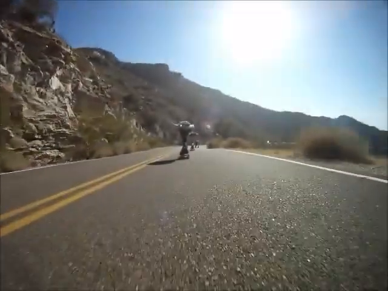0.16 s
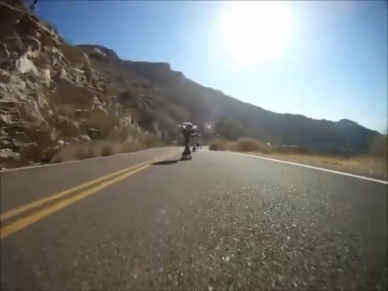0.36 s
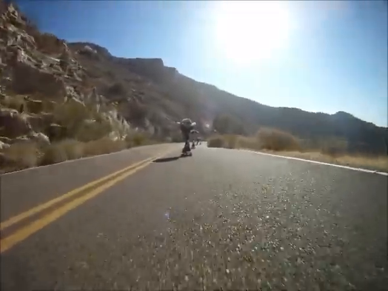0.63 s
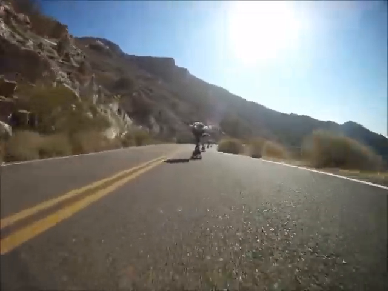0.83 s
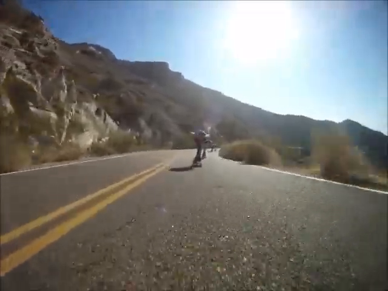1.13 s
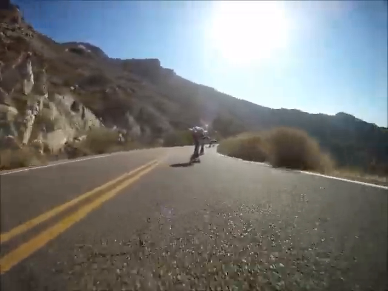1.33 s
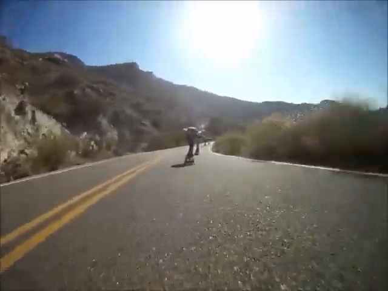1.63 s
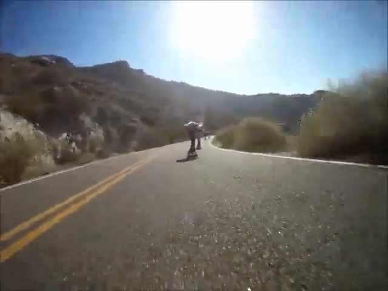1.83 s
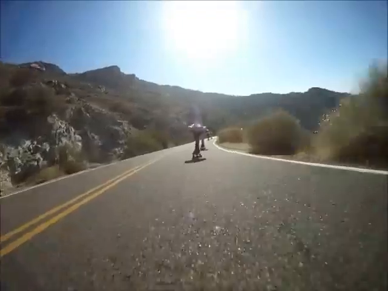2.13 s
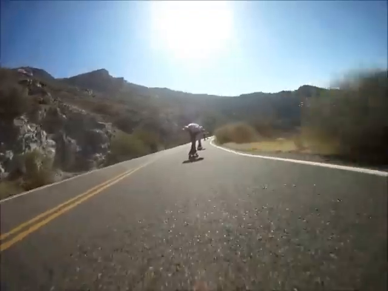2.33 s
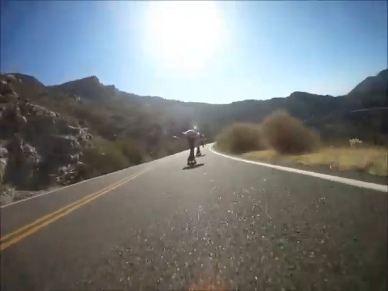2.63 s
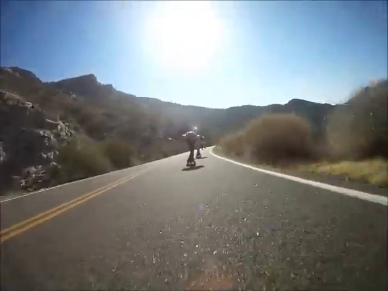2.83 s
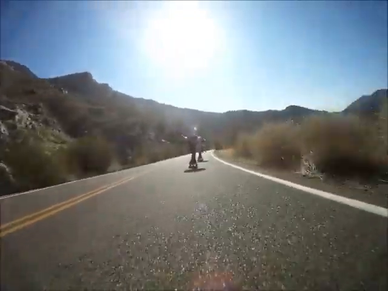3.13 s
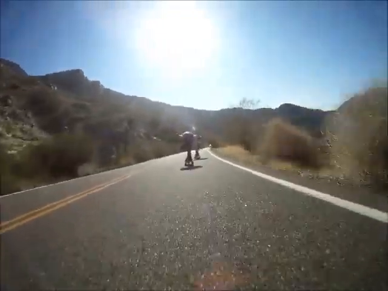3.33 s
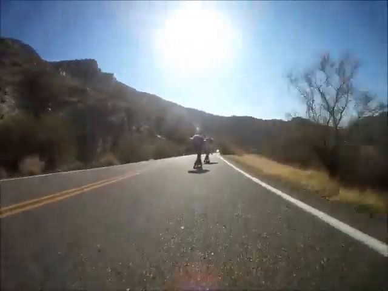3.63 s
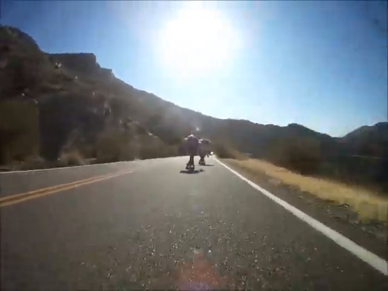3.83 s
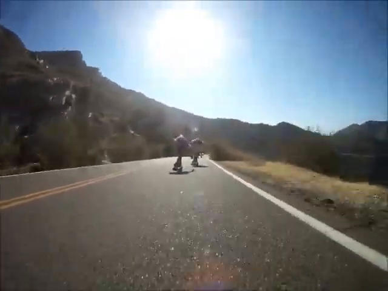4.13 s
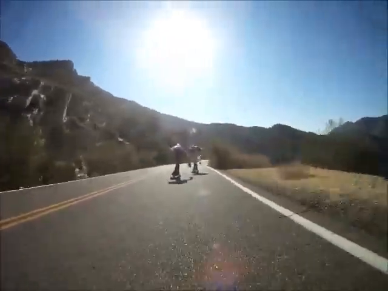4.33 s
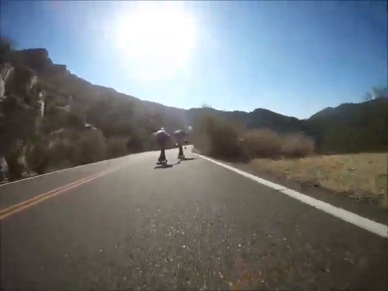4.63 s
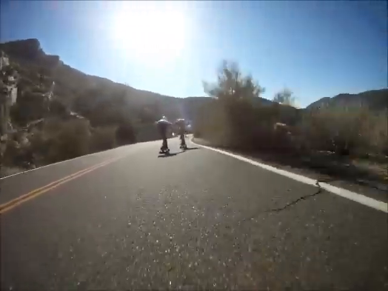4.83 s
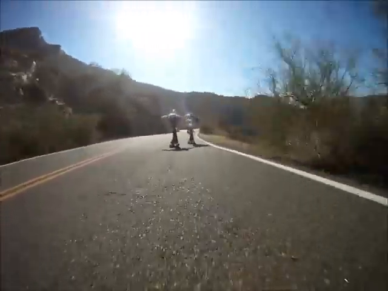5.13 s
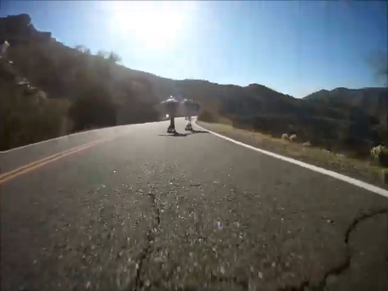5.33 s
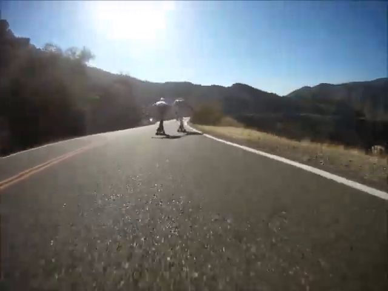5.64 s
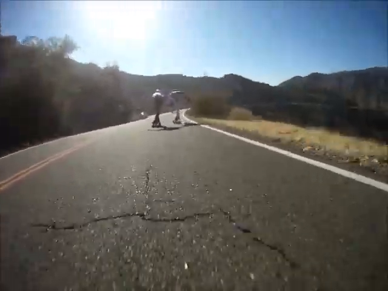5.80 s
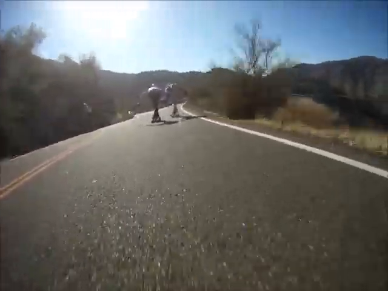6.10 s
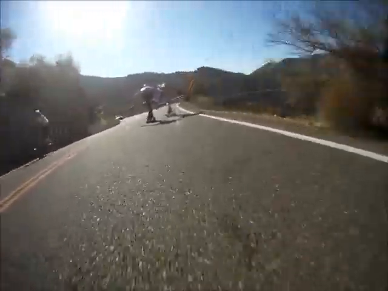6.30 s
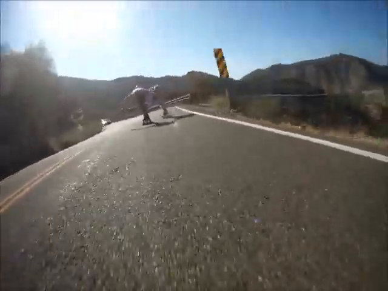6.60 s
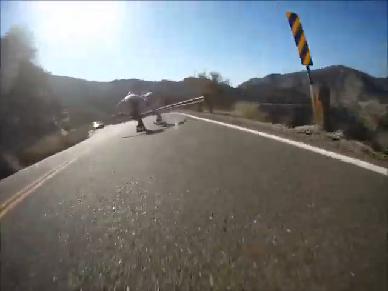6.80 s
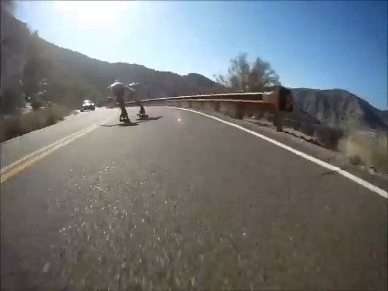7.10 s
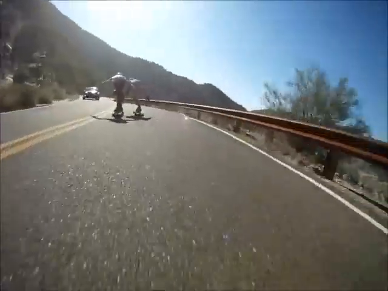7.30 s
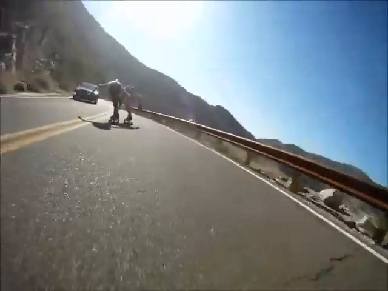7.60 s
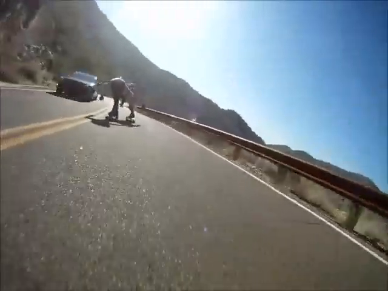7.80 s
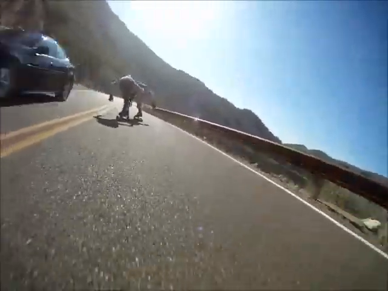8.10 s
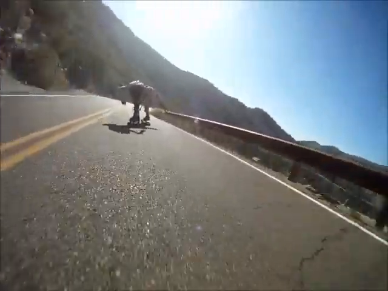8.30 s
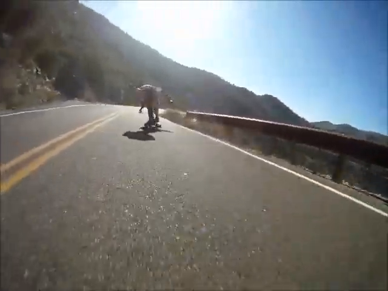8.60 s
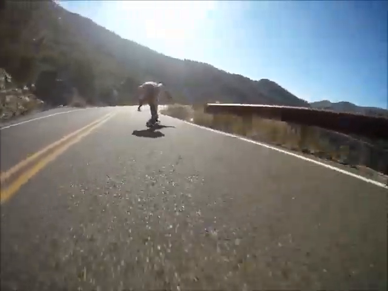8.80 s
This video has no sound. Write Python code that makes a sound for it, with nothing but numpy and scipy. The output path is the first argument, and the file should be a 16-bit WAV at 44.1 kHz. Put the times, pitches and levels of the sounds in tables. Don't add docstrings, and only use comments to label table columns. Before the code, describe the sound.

Gritty, metallic wheel roar from a longboard on pavement swells gradually, joined by low wind flutter, several heavy thumps and one sharp pebble click.

```python
import sys
import numpy as np
from scipy import signal
from scipy.fft import rfft, irfft
from scipy.io import wavfile
from scipy.ndimage import uniform_filter1d

SR = 44100
rng = np.random.default_rng(int(sys.argv[2]) if len(sys.argv) > 2 else 0)


def to_wav(s):
    ch = np.atleast_2d(s).T
    pcm = np.round(np.clip(ch, -1, 1) * 32767)
    wavfile.write(sys.argv[1], SR, pcm.astype(np.int16))


def ratio_of_db(decibels):
    return 10 ** (np.asarray(decibels, float) / 20)


N = 394694


def evened(x):
    return x / np.sqrt(np.mean(x ** 2) + 1e-20)


def curves(rows, t):
    s, *columns = np.transpose(rows)
    return [np.interp(t, s, c) for c in columns]


def slow(t, low_hz, top_hz):
    total = 0
    for hz in np.geomspace(low_hz, top_hz, num=30):
        total = total + np.sin(2 * np.pi * (hz * t + rng.random())) / np.sqrt(hz)
    return evened(total)


def plateau(t, start, length, edge):
    return (np.tanh((t - start) / edge) - np.tanh((t - start - length) / edge)) / 2


def power_of(modes, hz, steep):
    power = sum(ratio_of_db(db) ** 2 / (1 + (2 * (hz - f) / width) ** 2) ** steep for f, width, db in modes)
    return power / power.mean()


def add(mix, s, sound):
    part = mix[round(s * SR):][:len(sound)]
    part += sound[:len(part)]


# time in seconds, rolling level in dB, load on the deck in dB,
# fineness of the grit in dB.
ROLLING = [(0.0, -52.5, -8.5, -16), (.95, -50.5, -6, -13.5), (1.8, -45.5, -7.5, -15.5),
           (2.35, -44.5, -5.5, -15.5), (2.9, -43, -8.5, -14), (3.5, -42, -8, -15), (4.15, -39.5, -6, -14),
           (4.6, -40.5, -8, -13), (5.2, -40, -6, -12.5), (5.7, -38.5, -2.5, -14), (6.3, -40, -2, -11),
           (6.9, -39, -1, -14), (7.15, -42, -0.5, -11.5), (7.5, -40.5, -0.5, -11), (7.8, -42, 1.5, -9),
           (8.1, -40, -2.5, -12), (8.65, -38.5, -4, -13.5), (8.95, -41, 0, -13)]
# start in seconds, change in dB, length in seconds.
HOPS = [(1.85, -2.5, .03), (1.76, 1.2, .07), (1.95, 2, .12), (2.41, -4, .1), (2.425, -4, .07),
        (2.675, -4, .04), (2.77, 1.2, .1), (3.47, -2, .07), (4.04, 1.5, .2), (5.06, -2, .05),
        (5.36, -2.5, 0.034), (6.02, -1.5, 0.024), (6.05, 2, .04), (7.92, 1.5, .03)]
# pitch in Hz, width in Hz, level in dB.
DECK = [(1045, 95, -6), (1140, 75, -1), (1259.6, 138, 1)]
# pitch in Hz, width in Hz, level in dB.
HOUSING = [(388, 580, -22), (546, 80, -19), (773, 144, -18), (890, 78, -19.5), (1004, 115, -6.5),
           (1480, 120, -8.5), (1695, 320, -8), (2116, 212, -1.5), (2283, 245, -0.5), (2566, 280, -5.5),
           (2835, 99, -7.5), (3220, 460, -10)]
# pitch in Hz, width in Hz, level in dB.
SMALL_PARTS = [(3650, 520, 1), (3963, 170, 1.5), (4260, 170, -2.5), (4810, 330, 1.5), (5055, 150, -6.5),
               (5496, 310, -5.5)]


def wheels():
    stones_per_s, hop_edge_s, deck_wobble_db = 16000, 0.0077, 0.7
    parts_hop = 0.45
    stone_db = 0.56 * np.minimum(rng.exponential(1, N), 4)
    knocks = rng.standard_normal(N) * ratio_of_db(stone_db) * (rng.random(N) < stones_per_s / SR)
    knocks *= ratio_of_db(0.25 * slow(np.arange(N) / SR, 10.0, 90))
    hz, t, spectrum = signal.stft(evened(knocks), SR, nperseg=1024, noverlap=768)

    level_db, load_db, grit_db = curves(ROLLING, t)
    hop_db = sum(db * plateau(t, s, length, hop_edge_s) for s, db, length in HOPS)
    level_db = level_db + hop_db
    deck_db = load_db + deck_wobble_db * slow(t, 3.0, 25)
    parts_db = grit_db - (1 - parts_hop) * hop_db + 0.5

    ring = power_of(HOUSING, hz, 1.58)[:, None]
    ring = ring + np.outer(power_of(DECK, hz, 1.86), ratio_of_db(deck_db) ** 2)
    ring = ring + np.outer(power_of(SMALL_PARTS, hz, 1.2), ratio_of_db(parts_db) ** 2)

    patches = uniform_filter1d(rng.standard_normal(spectrum.shape), size=6, axis=1)
    patches = evened(uniform_filter1d(patches, size=8, axis=0))
    spectrum = spectrum * np.sqrt(ring) * ratio_of_db(level_db + 1.39 + 0.57 * patches)
    return signal.istft(spectrum, SR, nperseg=1024, noverlap=768)[1][:N]


def swing(hz, width, lumpy):
    r = np.exp(-np.pi * width / SR)
    z = rng.standard_normal(N) + 1j * rng.standard_normal(N)
    for _ in range(2):
        z = signal.lfilter([1 - r], [1, -r], z)
    power = abs(z) ** 2
    z = z / (power + power.mean() / 10) ** ((1 - lumpy) / 2)
    return evened((z * np.exp(2j * np.pi * hz * np.arange(N) / SR)).real)


# time in seconds, level in dB.
AIRSPEED = [(0.0, -46), (.15, -61), (.5, -56), (1.3, -55), (1.6, -51), (2.25, -48), (2.6, -43.5),
            (2.9, -46), (3.2, -45.5), (3.8, -45), (4.05, -40), (4.45, -44), (5.05, -44), (5.3, -43),
            (6.3, -42), (7.3, -44.5), (8.5, -41), (8.95, -45)]
# start in seconds, length in seconds, depth in dB.
LULLS = [
    (.33, .12, -5),
    (1.34, .1, -7),
    (2.95, .06, -5),
    (4.66, .06, -6),
    (5.0, .1, -6),
    (6.62, .13, -6),
    (7.07, .06, -10),
    (7.35, .06, -9),
    (7.82, .05, -6),
]
# start in seconds, length in seconds, level in dB, bounce over sway in
# dB.
SMALL_GUSTS = [
    (1.533, 0.067, -42.5, 9),
    (1.74, .06, -44, 4),
    (2.557, 0.05, -36.5, 7),
    (3.06, 0.066, -41, -8),
    (3.38, .04, -36, 1),
    (3.933, 0.062, -36, 2),
    (4.067, .04, -36, 0),
    (8.89, .06, -39, -10),
               (4.38, 0.054, -36.5, 0.1), (4.825, 0.03, -37, -2), (5.152, 0.046, -36, 5),
              (5.243, 0.09, -34, 0.1), (5.619, 0.052, -37, 0.1), (5.725, 0.06, -36, -2),
              (5.913, 0.08, -38, -3), (6.084, 0.05, -38, 0.1), (6.154, 0.072, -36.5, 2),
              (6.232, 0.13, -38, 0.1), (6.439, 0.034, -34, 0.1), (6.805, 0.034, -36, 3),
              (6.858, 0.034, -32, 5), (6.906, 0.072, -36, 0.1), (7.008, 0.042, -34.5, -1),
              (7.256, 0.032, -36, 0.1), (7.305, 0.03, -38, 0.1), (7.483, 0.083, -37, 2),
              (7.571, 0.03, -34, 3), (7.651, 0.039, -36, 0.1), (7.892, 0.063, -35, 3),
              (8.078, 0.044, -37, 0.1), (8.13, 0.032, -36, 0.1), (8.197, 0.091, -33, -1),
              (8.341, 0.032, -33, 0.1), (8.399, 0.3, -32.5, -1), (8.745, 0.11, -33, -5)]
# pitch in Hz, level in dB per Hz.
ROAR_COLOUR = [(22, -3), (55, -30), (105, -5), (150, -4), (220, -10), (330, -19), (600, -24.5), (1500, -70)]


def wind(shoves):
    gust_edge_s, flutter_db = 0.02, 1.5
    sway_db, bounce_db = -0.5, -1
    roar_db, roar_share = -55.8, 0.75
    gust_roar_db, thump_roar_db = -23, -31
    t = np.arange(N) / SR
    coarse = t[::200]
    speed_db = curves(AIRSPEED, coarse)[0]
    lull_db = sum(db * plateau(coarse, start, length, gust_edge_s) for start, length, db in LULLS)
    air_db = np.interp(t, coarse, speed_db + lull_db)

    gust, lean_db = 0, 0
    for start, length, db, tilt_db in SMALL_GUSTS:
        shape = plateau(coarse, start, length, gust_edge_s)
        gust = gust + ratio_of_db(db) * shape
        lean_db = lean_db + tilt_db * shape / 2
    gust, lean_db = np.interp(t, coarse, gust), np.interp(t, coarse, lean_db)

    sway_flutter_db = np.interp(t, coarse, flutter_db * slow(coarse, 1.5, 12))
    bounce_flutter_db = np.interp(t, coarse, flutter_db * slow(coarse, 1.5, 13))
    sway = np.hypot(ratio_of_db(air_db + sway_db + sway_flutter_db), 0.64 * gust * ratio_of_db(-lean_db))
    bounce = np.hypot(ratio_of_db(air_db + bounce_db + bounce_flutter_db), 0.66 * gust * ratio_of_db(lean_db))
    rocking = sway * swing(hz=47, width=22.7, lumpy=0.75)
    rocking += bounce * swing(hz=80, width=16.2, lumpy=0.78)

    steady_push = ratio_of_db(roar_db + roar_share * (curves(AIRSPEED, t)[0] + 44))
    gust_push, thump_push = gust * ratio_of_db(gust_roar_db), shoves * ratio_of_db(thump_roar_db)
    push = np.sqrt(steady_push ** 2 + gust_push ** 2 + thump_push ** 2)
    hz, db = np.transpose(ROAR_COLOUR)
    colour = ratio_of_db(np.interp(np.log(np.fft.rfftfreq(N, 1 / SR) + 1), np.log(hz), db))
    roar = evened(irfft(rfft(rng.standard_normal(N)) * colour, N))
    roar *= ratio_of_db(1.5 * slow(t, 4.0, 40))
    return rocking + push * roar


# time of the widest swing in seconds, peak in dB, pitch in Hz,
# length in seconds.
THUMPS = [(0.025, -36, 54, .03), (2.027, -32, 85, 0.033), (2.368, -20, 73, 0.019),
          (2.405, -17.5, 62, 0.022), (2.442, -19.5, 48.2, 0.017), (2.487, -27, 55.4, 0.018),
          (2.515, -28, 90, .015), (2.536, -29.5, 62, .02), (2.686, -20, 79, 0.016),
          (2.73, -21.5, 74, 0.021), (3.457, -16.5, 69, .016), (3.493, -19, 79.5, .022),
          (3.519, -19.5, 72, 0.014), (3.443, -25, 60, .01), (3.556, -23, 80.5, .03),
          (3.604, -25, 55.7, 0.014), (4.122, -21.5, 60, 0.012), (4.153, -19.5, 83, 0.025),
          (4.193, -17.5, 78, 0.017), (4.219, -16.5, 77, 0.034), (4.258, -23, 55, .02),
          (4.276, -28, 50, .012), (4.297, -23, 50, .016), (4.317, -20.5, 65.5, 0.019),
          (4.356, -24, 70, 0.013)]


def thumps():
    rise_share = 0.75
    before = 6000
    t = np.arange(-before, before) / SR
    shoves, swings = np.zeros(N + before), np.zeros(N + before)
    for s, db, hz, length in THUMPS:
        swell = ratio_of_db(db) * np.exp(-(t / (length * np.where(t < 0, rise_share, 1))) ** 2)
        turn = 2 * np.pi * hz * t
        add(shoves, s, swell)
        add(swings, s, swell * (np.cos(turn) + 0.036 * np.cos(2 * turn)))
    return shoves[before:], swings[before:]


# time in seconds, peak in dB.
PEBBLES = [
    (7.9132, -18),
    (7.9155, -22),
    (2.418, -44),
    (2.443, -50),
    (1.01, -47),
]
# pitch in Hz, level in dB, time to fade by 60 dB in seconds.
SHELL = [(1270, -7.5, 0.033), (1670, -6.5, 0.018), (2060, -1, .022), (2350, -9, .025), (3630, -1, 0.013),
         (4410, -5, .011), (5460, -7, .01)]


def pebbles():
    out, t = np.zeros(N), np.arange(2000) / SR
    ring = sum(ratio_of_db(db - 60 * t / t60) * np.sin(2 * np.pi * hz * t) for hz, db, t60 in SHELL)
    onset = 1 - np.exp(-t / 0.00035)
    for s, db in PEBBLES:
        crack = ratio_of_db(3.5 - 60 * t / 0.0096) * np.diff(rng.standard_normal(len(t) + 1))
        add(out, s, ratio_of_db(db) * (ring + crack) * onset)
    return out


# time in seconds, peak in dB, length in seconds.
JOLTS = [
    (2.405, -26, 0.0019),
    (2.687, -38, 0.0019),
    (2.729, -33, 0.0025),
    (3.458, -26, 0.0029),
    (4.192, -40, 0.0025),
]


def jolts():
    out = np.zeros(N)
    for s, db, length in JOLTS:
        u = (np.arange(-400, 400) / SR / length) ** 2
        add(out, s - 400 / SR, ratio_of_db(db) * (1 - u) * np.exp(-u / 2))
    return out


# start in seconds, length in seconds, level in dB, swell in dB.
SEAM = (4.124, .054, -32.5, 4)
# pitch in Hz, width in Hz, level in dB.
SEAM_RING = [(600, 160, -6), (900, 200, -7), (1230, 270, 2), (1560, 280, -4), (2010, 280, 1),
             (2500, 400, -12)]


def seam():
    start, length, db, swell_db = SEAM
    out, size = np.zeros(N), 4096
    u = np.arange(size) / SR / length
    knocks = rng.standard_normal(size) * (rng.random(size) < 2500 / SR)
    ring = np.sqrt(power_of(SEAM_RING, np.fft.rfftfreq(size, 1 / SR), 1.5))
    rattle = evened(irfft(rfft(knocks) * ring, size))
    add(out, start, ratio_of_db(db - swell_db * (1 - u)) * plateau(u, 0.092, 0.93, 0.055) * rattle)
    return out


def scene():
    shoves, swings = thumps()
    mix = wheels() + wind(shoves) + swings + pebbles() + jolts() + seam()
    return mix[None]


def roll_off(x):
    return signal.sosfilt(signal.butter(12, 15720, fs=SR, output="sos"), x)


def record(dry):
    power_db = 10 * np.log10(abs(uniform_filter1d(dry[0] ** 2, size=600)) + 1e-12)
    fall = np.arange(N) * 32.0 / SR
    held_db = np.maximum.accumulate(power_db + fall) - fall
    over_db = np.maximum(held_db + 30.0, 0)
    ducked = dry / ratio_of_db(0.15 * uniform_filter1d(over_db, size=300))
    ducked = signal.lfilter(*signal.butter(2, 13.0, "high", fs=SR), ducked)

    sampled = signal.resample_poly(ducked, 40, 147, axis=1, window=("kaiser", 8))
    held = signal.resample_poly(np.repeat(sampled, 4, axis=1), 147, 160, axis=1)
    edge = signal.firwin(511, 15210, window=("kaiser", 9), fs=SR)
    return roll_off(signal.oaconvolve(held[:, :N], edge[None], "same"))


dry = scene()
out = record(dry)
to_wav(out)
```